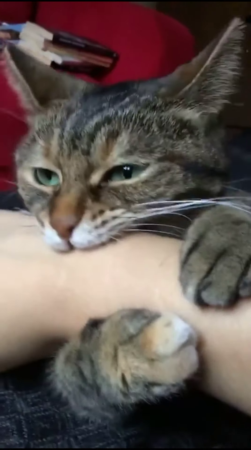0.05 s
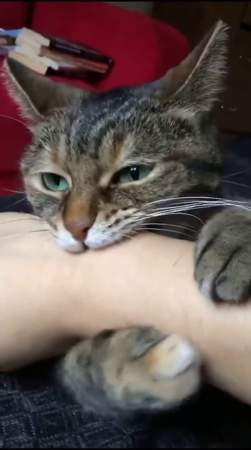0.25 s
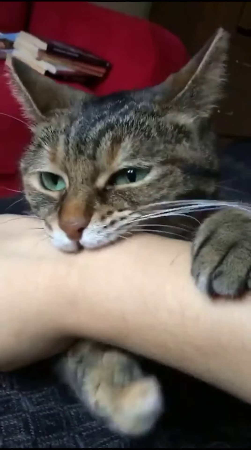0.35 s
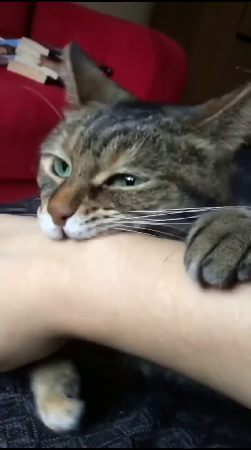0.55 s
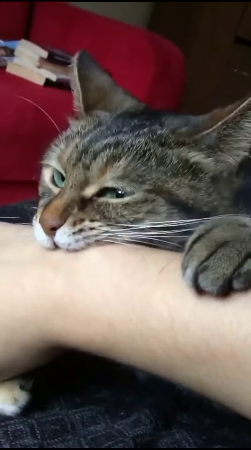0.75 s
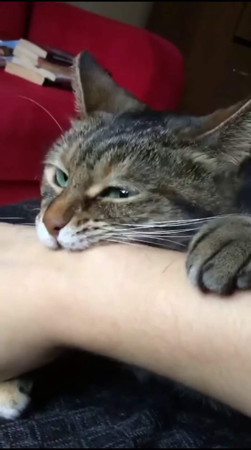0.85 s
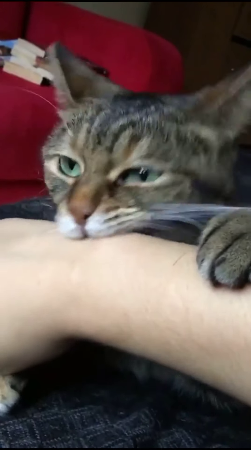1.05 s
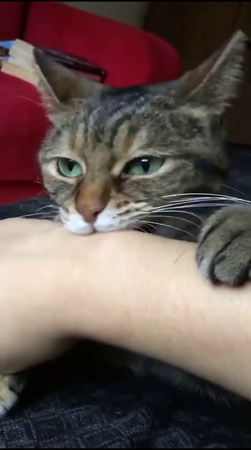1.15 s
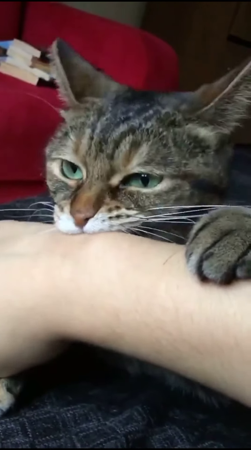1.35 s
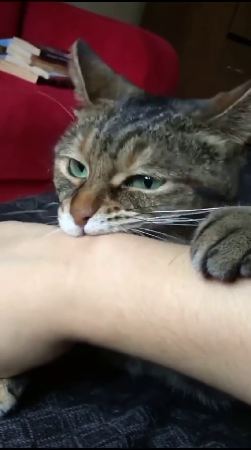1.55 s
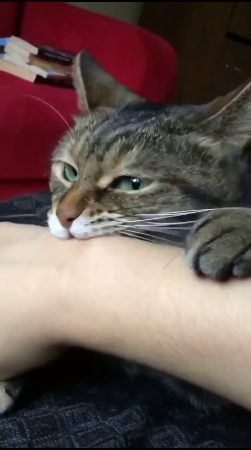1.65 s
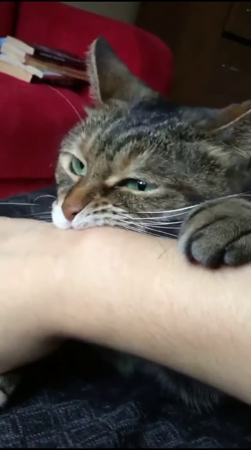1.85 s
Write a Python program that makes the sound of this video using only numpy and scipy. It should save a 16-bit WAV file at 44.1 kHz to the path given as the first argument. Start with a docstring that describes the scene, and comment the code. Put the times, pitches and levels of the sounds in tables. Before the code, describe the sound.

A cat gives one long, complaining meow close by, starting at about 0.2 seconds with a small throat pop. The slightly raspy call rises and brightens until around 0.6 seconds, then slowly sinks and dulls, cutting off with another small pop at 1.2 seconds. A very faint, high tick follows near 1.6 seconds. A soft, low rumble fills the quiet, furnished room throughout.

```python
"""A close cat gives one long, complaining meow in a quiet, furnished room with a low rumble.
At 0.2 s the throat pops open behind a closed mouth and the vocal folds start to vibrate.
The voice rises and brightens as the mouth opens, then sinks and dulls as it closes.
At 1.2 s the throat cuts it off with a second pop. One faint, high tick follows at 1.6 s."""
import sys
import numpy as np
from scipy import signal
from scipy.fft import rfft, irfft
from scipy.io import wavfile

SR = 44100
rng = np.random.default_rng(int(sys.argv[2]) if len(sys.argv) > 2 else 0)


def store_wav(level_fs):
    """Save 16-bit WAV to argv[1]."""
    pcm = np.round(np.clip(np.atleast_2d(level_fs), -1, 1) * 32767)
    wavfile.write(sys.argv[1], SR, pcm.T.astype(np.int16))


N = 83790

# Room noise spectrum: freq_hz, relative_db
FLOOR_SPECTRUM = [(25, -43), (33, -31), (45, -9), (65, -6), (90, -10.5), (115, -5.5), (155, -9),
                  (236, -7.5), (419, -14), (688, -22.5), (1250, -24.5), (1810, -26.5), (3500, -37.5),
                  (7000, -42), (8400, -42), (12800, -46)]
# Throat opening and shutting: centre_s, ring_hz, sigma_s, peak_db
THROAT_POPS = [(.2003, 590, 0.0018, -32.5), (.1975, 1120, 0.00075, -46), (1.2082, 562, 0.0022, -36)]
# Air through the vocal folds: freq_hz, relative_db
AIR_SPECTRUM = [(300, 0.5), (900, -0.5), (2200, -7), (3000, -21), (3900, -7.5), (4700, -16), (5700, -7.5),
                (6600, -22), (7800, -10), (10000, -15.5), (13000, -22)]
# Overtone colour, mouth closed: freq_hz, gain_db
CLOSED_SPECTRUM = [(1330, -22.5), (1800, -34.5), (2250, -29), (2700, -49.5), (3050, -55), (3600, -32),
                   (3980, -52.5), (4500, -67), (4900, -57), (5400, -49.5), (5800, -34.5), (6200, -43),
                   (6700, -68), (7800, -44.5), (8500, -65), (9700, -60), (13000, -62)]
# Overtone colour, mouth half open: freq_hz, gain_db
HALF_SPECTRUM = [(1550, -26.5), (2080, -19), (2600, -31), (3100, -38.5), (3560, -37.5), (4150, -51.5),
                 (4700, -55.5), (5200, -42.5), (5700, -43.5), (6300, -44.5), (7100, -49), (7900, -40),
                 (8500, -39), (9300, -46), (9900, -48.5), (10500, -62), (13000, -61.5)]
# Overtone colour, mouth wide: freq_hz, gain_db
WIDE_SPECTRUM = [(1580, -10.5), (2110, -16), (2640, -31), (3170, -38), (3700, -36.5), (4220, -58.5),
                 (4750, -48.5), (5280, -23), (5800, -56), (6340, -41.5), (7400, -35.5), (8700, -40),
                 (9500, -30), (10000, -40), (10550, -38), (11700, -53.5), (13000, -56)]
# Tight-throat resonances and notches: centre_s, sigma_s, centre_hz, glide_hz_per_s, sigma_hz, gain_db
THROAT_SQUEAKS = [(0.34, 0.064, 5460, -4500, 220, 14), (.33, 0.026, 7650, -4000, 300, 10),
                  (0.284, 0.057, 4080, 3003, 170, 16.5), (0.336, 0.13, 3370, 3000, 222, -19),
                  (0.354, 0.07, 2340, 3000, 202, 5), (0.45, 0.028, 7250, 3000, 250, 9),
                  (0.67, 0.059, 5310, 0, 201, 4), (0.672, 0.026, 8000, 0, 250, 6),
                  (0.912, 0.048, 8460, -3000, 600, 4), (1.076, 0.067, 3300, -2500, 170, 4.5),
                  (1.19, 0.018, 3560, -2000, 200, 10.5)]
# Vocal fold vibration: time_s, pitch_hz
FOLD_PITCH = [(0.21, 443.2), (0.234, 454.4), (0.24, 434.8), (0.308, 457.7), (0.378, 494.7), (0.458, 524.4),
              (0.584, 528.7), (0.79, 522.6), (0.894, 505.3), (0.962, 502), (1.076, 474.3), (1.098, 458.4),
              (1.166, 459.8), (1.188, 444.8), (1.195, 448)]
# Vocal effort: time_s, fundamental_db, second_harmonic_db
VOICE_LEVELS = [(0.205, -39.5, -54.5), (0.275, -41, -46.5), (0.303, -42, -48.5), (0.343, -37.5, -42.5),
                (0.389, -39, -39.5), (0.445, -38.5, -35), (0.505, -37.5, -36), (0.605, -36, -34.5),
                (0.739, -37.5, -40), (0.857, -37.5, -39.5), (0.959, -37.5, -42.5), (1.037, -39.5, -46.5),
                (1.065, -37, -45), (1.175, -38, -48.5), (1.2, -41, -59)]
# Mouth (0 closed, 1 wide): time_s, opening
MOUTH_OPENING = [(.2, 0.075), (.28, 0.23), (.35, 0.2), (.43, 0.68), (.45, 0.73), (.485, 0.96), (.6, .98),
                 (.68, 0.78), (.8, 0.49), (.92, 0.46), (1.04, 0.26), (1.13, 0.2), (1.2, 0.22)]
# Voice roughness (0 to 1): time_s, roughness
ROUGHNESS = [(.2, 0.32), (.33, 0.43), (.43, 0.33), (.48, 0.21), (.61, 0.15), (.64, 0.26), (.665, 0.07),
             (.9, 0.16), (1.05, 0.24), (1.16, .3), (1.19, 0.54), (1.21, 0.2)]
# Harmonic 3, on top of the mouth colour: time_s, gain_db
THIRD_GAIN = [(.2, -9), (.3, 3), (.41, -4), (.48, 2), (.72, -0.5), (.81, 2), (.87, 5), (.925, 0), (.98, 5),
              (1.04, 13.5), (1.1, 6), (1.16, -1.5)]
# Harmonics 4 and up, on top of the mouth colour: time_s, middle_db, treble_db
BAND_GAINS = [(.2, -5.5, -27), (.24, -2, -10), (.26, 4.5, 6), (.33, 7.5, 3), (.41, 2, -1), (.49, 3, 6),
              (.62, 2.5, -1.5), (.7, 6, 5), (.82, 4, 6), (.95, 1.5, -2.5), (1.05, 5, 1), (1.15, -0.5, -4),
              (1.19, 2, -8)]

FLOOR_DB, RUMBLE_DB, RUMBLE_HZ, RUMBLE_SIGMA_HZ = -61.5, -67, 150, 19
ROOM_DB, ROOM_T60_S, ROOM_DAMP_HZ = -17.5, 0.3, 5100
TICK_S, TICK_SIGMA_S, TICK_HZ, TICK_SIGMA_HZ, TICK_DB = 1.638, 0.0032, 8300, 640, -72.5
START_S, STOP_S, ATTACK_S, RELEASE_S = .197, 1.211, .004, 0.0076
AIR_BASE_DB, AIR_OPEN_DB = -61.5, 5.5
JITTER_DEPTH, JITTER_HZ, WAVER_DEPTH, WAVER_HZ = 0.01, 136, 0.0026, 73
FLICKER_DB, FLICKER_HZ, SHIMMER_DB = 3, 22.6, 0.6  # depths at roughness 1
RASP_DB, RASP_RATE_HZ, RASP_ABOVE_HZ = 3, 120, 6000
TREBLE_HZ, CROSSFADE_HZ, LOWPASS_HZ = 4840, 650, 12950
DISPERSION_RAD = 0.121  # times harmonic number squared: the throat smears each pulse


def undb(db):
    """Decibels to gain."""
    return 10 ** (np.asarray(db) / 20)


def curve(table, column=1):
    """One column of a time table at every sample."""
    rows = np.array(table, float)
    return np.interp(np.arange(N) / SR, rows[:, 0], rows[:, column])


def spectrum_db(table, hz):
    """Spectrum table interpolated over log frequency."""
    rows = np.array(table, float)
    return np.interp(np.log(np.maximum(hz, 1)), np.log(rows[:, 0]), rows[:, 1])


def noise(gain):
    """Unit-rms noise shaped by gain(hz)."""
    x = irfft(rfft(rng.standard_normal(N)) * gain(np.arange(N // 2 + 1) * SR / N), N)
    return x / x.std()


def bell(x, centre, sigma):
    """Gaussian of height 1."""
    return np.exp(-.5 * ((x - centre) / sigma) ** 2)


def wander(rate_hz):
    """Random wavering up to about rate_hz."""
    size = 4096
    hz = np.arange(size // 2 + 1) * SR / N
    x = irfft(rfft(rng.standard_normal(size)) * bell(hz, 0, rate_hz))
    return np.interp(np.arange(N) * size / N, np.arange(size), x / x.std())


def background():
    """Quiet hiss and a low rumble."""
    hiss = undb(FLOOR_DB) * noise(lambda hz: undb(spectrum_db(FLOOR_SPECTRUM, hz)))
    rumble = undb(RUMBLE_DB) * noise(lambda hz: bell(hz, RUMBLE_HZ, RUMBLE_SIGMA_HZ))
    return hiss + rumble


def room(x, t):
    """Direct sound plus short, soft reflections from the furniture."""
    decay = np.exp(-np.log(1000) * t / ROOM_T60_S)
    tail = decay * noise(lambda hz: 1 / np.hypot(1, hz / ROOM_DAMP_HZ))
    return x + undb(ROOM_DB) * signal.fftconvolve(x, tail / np.linalg.norm(tail))[:N]


def tick(t):
    """Faint burst of high, narrow-band noise."""
    envelope = undb(TICK_DB) * bell(t, TICK_S, TICK_SIGMA_S)
    return envelope * noise(lambda hz: bell(hz, TICK_HZ, TICK_SIGMA_HZ))


def throat_pops(t):
    """A few cycles of throat resonance at each end of the call."""
    return sum(undb(peak_db) * bell(t, centre_s, sigma_s) * np.cos(2 * np.pi * ring_hz * (t - centre_s))
               for centre_s, ring_hz, sigma_s, peak_db in THROAT_POPS)


def breath(phase, roughness, mouth):
    """Air rushing through the vocal folds, one puff per cycle."""
    puffs = noise(lambda hz: undb(spectrum_db(AIR_SPECTRUM, hz))) * (1 + np.cos(phase))
    return puffs * roughness * undb(AIR_BASE_DB + AIR_OPEN_DB * mouth)


def vocal_tract_db(hz, t, mouth):
    """Overtone gain from the mouth shape and the throat's passing resonances and notches."""
    closed, wide = np.maximum(1 - 2 * mouth, 0), np.maximum(2 * mouth - 1, 0)
    total_db = (closed * spectrum_db(CLOSED_SPECTRUM, hz)
                + (1 - closed - wide) * spectrum_db(HALF_SPECTRUM, hz)
                + wide * spectrum_db(WIDE_SPECTRUM, hz))
    for centre_s, sigma_s, centre_hz, glide_hz_per_s, sigma_hz, gain_db in THROAT_SQUEAKS:
        squeak_hz = centre_hz + glide_hz_per_s * (t - centre_s)
        total_db += gain_db * bell(t, centre_s, sigma_s) * bell(hz, squeak_hz, sigma_hz)
    return total_db


def meow(t):
    """Vocal fold harmonics coloured by the moving mouth, plus breath."""
    roughness, mouth = curve(ROUGHNESS), curve(MOUTH_OPENING)
    pitch_hz = curve(FOLD_PITCH) * (1 + WAVER_DEPTH * wander(WAVER_HZ))
    jitter = 1 + JITTER_DEPTH * roughness * wander(JITTER_HZ)
    phase = 2 * np.pi * np.cumsum(pitch_hz * jitter) / SR
    fundamental_db, second_db = curve(VOICE_LEVELS), curve(VOICE_LEVELS, column=2)
    middle_db, treble_db = curve(BAND_GAINS), curve(BAND_GAINS, column=2)
    rasp_db = RASP_DB * np.maximum(2 * mouth - 1, 0) * wander(RASP_RATE_HZ)  # flutter at full cry
    voice = undb(fundamental_db) * np.cos(phase + DISPERSION_RAD)
    voice += undb(second_db) * np.cos(2 * phase + DISPERSION_RAD * 2 ** 2)
    coarse = slice(None, None, 32)
    for k in range(3, 29):
        hz = k * pitch_hz
        tract_db = np.interp(t, t[coarse], vocal_tract_db(hz[coarse], t[coarse], mouth[coarse]))
        if k == 3:
            band_db = curve(THIRD_GAIN)
        else:
            blend = np.clip((hz - TREBLE_HZ) / CROSSFADE_HZ + .5, 0, 1)
            band_db = (1 - blend) * middle_db + blend * treble_db + (hz > RASP_ABOVE_HZ) * rasp_db
        flicker_db = FLICKER_DB * np.sqrt(roughness) * wander(FLICKER_HZ)
        level_db = fundamental_db + tract_db + band_db + flicker_db
        voice += undb(level_db) * np.cos(k * phase + DISPERSION_RAD * k ** 2)
    shimmer = undb(SHIMMER_DB * roughness * wander(JITTER_HZ))
    voice *= -np.sqrt(2) * shimmer  # rms to peak, inverted
    gate = np.clip((t - START_S) / ATTACK_S, 0, 1) * np.clip((STOP_S - t) / RELEASE_S, 0, 1)
    return gate * (voice + breath(phase, roughness, mouth))


def scene():
    """Cat and tick in the room, over the background; mono."""
    t = np.arange(N) / SR
    direct = meow(t) + throat_pops(t) + tick(t)
    return (room(direct, t) + background())[None]


def record(dry):
    """Steep elliptic low-pass."""
    return signal.sosfilt(signal.ellip(12, rp=.1, rs=70, Wn=LOWPASS_HZ, fs=SR, output="sos"), dry)


dry = scene()
out = record(dry)
store_wav(out)
```